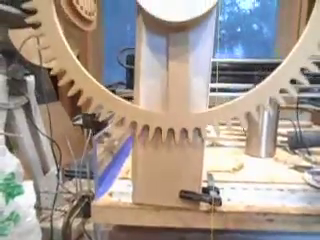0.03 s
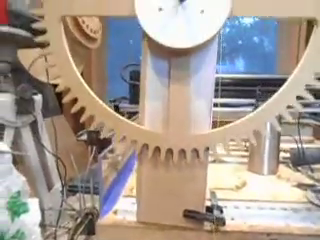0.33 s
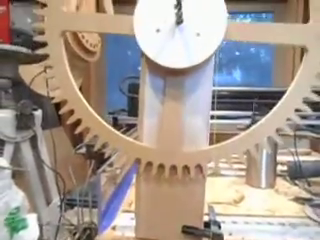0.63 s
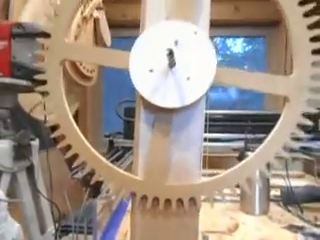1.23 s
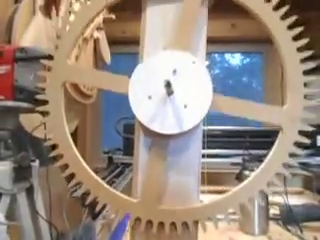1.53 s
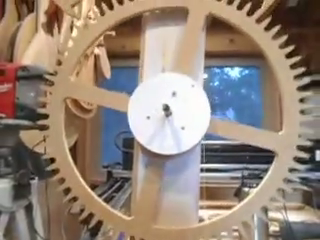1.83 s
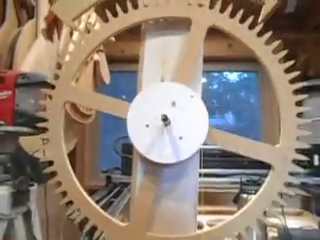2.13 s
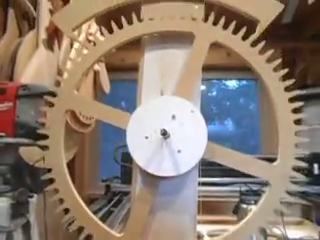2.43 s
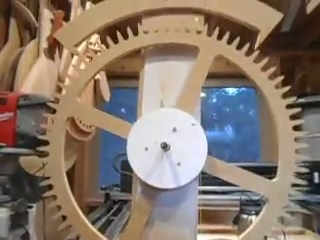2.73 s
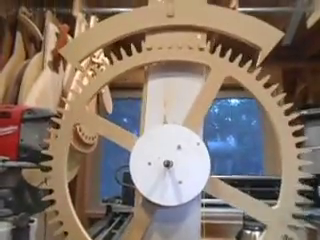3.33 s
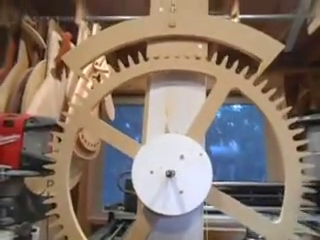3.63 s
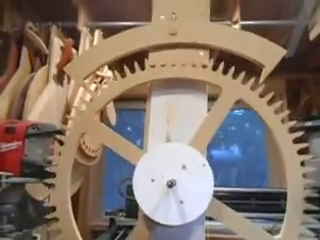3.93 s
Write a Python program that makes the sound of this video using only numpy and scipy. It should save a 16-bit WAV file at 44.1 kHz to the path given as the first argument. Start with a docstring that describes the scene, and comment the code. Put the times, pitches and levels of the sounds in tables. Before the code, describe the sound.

A wooden clock mechanism ticks and tocks in uneven pairs, a lighter knock followed quickly by a heavier one. Its teeth softly scuff between beats and a loose part clacks once, heard up close in a quiet workshop.

```python
"""A large wooden escapement beats a limping tick-tock, close to one microphone in a small, quiet workshop.
A tooth rubs off one pallet, now and then snagging or squeaking, and the next lands on the other: a sharp
contact click, then a knock that spreads through wheel and frame, treble first and bass later. On the tock
the tooth also seats with a crack and recoils. A loose part clacks; the room rumbles and hisses behind."""
import sys
import numpy as np
from scipy import signal
from scipy.io import wavfile
from scipy.ndimage import uniform_filter1d

SR = 44100
rng = np.random.default_rng(int(sys.argv[2]) if len(sys.argv) > 2 else 0)


def bounce(signal):
    """Save signal as a 16-bit WAV file at the path given by the first command-line argument."""
    frames = np.transpose(np.atleast_2d(signal))
    limited = np.clip(frames, -1, 1)
    pcm = np.round(limited * 32767).astype(np.int16)
    wavfile.write(sys.argv[1], SR, pcm)


N = 176400
AGE = np.arange(SR // 2) / SR   # time since a blow [s]
BAND_HZ = 25 * 2 ** (np.arange(28) / 3)
BAND_FILTERS = [signal.butter(2, [hz * 2 ** (-1 / 6), hz * 2 ** (1 / 6)], "band", fs=SR, output="sos")
                for hz in BAND_HZ]


def from_db(db):
    """Decibels as an amplitude factor."""
    return 10 ** (np.asarray(db) / 20)


def at_bands(points, below=None):
    """A table read at the third-octave centres, as a column."""
    hz, value = np.transpose(points)
    return np.interp(np.log(BAND_HZ), np.log(hz), value, left=below)[:, None]


def add(out, s, sound):
    """Mix a sound in at time s."""
    i = int(s * SR)
    part = sound[max(-i, 0):max(N - i, 0)]
    out[max(i, 0):max(i, 0) + len(part)] += part


def band_noise(size):
    """Third-octave bands of noise, rms 1 each."""
    white = rng.standard_normal((2, size + SR // 10))
    bands = np.array([signal.sosfilt(sos, white[k % 2])[-size:] for k, sos in enumerate(BAND_FILTERS)])
    return bands / bands.std(axis=1, keepdims=True)


def coloured_noise(colour, resonances):
    """Steady broad noise, plus noise passed twice through each narrow resonance."""
    out = (from_db(at_bands(colour)) * band_noise(N)).sum(0)
    for hz, width, db in resonances:
        b, a = signal.iirpeak(hz, hz / width, fs=SR)
        band = signal.lfilter(b, a, signal.lfilter(b, a, rng.standard_normal(N)))
        out += from_db(db) * band / band.std()
    return out


# Room tone of the workshop: (frequency [Hz], third-octave level [dB])
ROOM_COLOUR = [(25, -52), (40, -47.5), (58, -48.5), (80, -52.5), (120, -56), (170, -45.5), (230, -52.5),
               (300, -47.5), (450, -55.5), (950, -47.5), (1500, -48), (2100, -48.5), (3200, -53.5),
               (4500, -61), (7700, -52.5), (10000, -55)]
# Narrow bands of hiss in the background: (frequency [Hz], width [Hz], level [dB])
ROOM_WHIRR = [(1025, 98, -55.5), (2256, 85, -50)]
# Slow drift of the room tone: (time [s], gain [dB])
ROOM_DRIFT = [(0, 2), (.45, 3), (.8, 0), (1.4, -0.5), (2, -1.5), (2.65, -2.5), (3.25, 0), (3.8, -3),
              (4, -1.5)]
def room_tone():
    """Soft rumble and hiss all round the microphone."""
    drift_db = np.interp(np.arange(N) / SR, *np.transpose(ROOM_DRIFT))
    return from_db(drift_db) * coloured_noise(ROOM_COLOUR, ROOM_WHIRR)


# Reverberation of the workshop: (frequency [Hz], t60 [s])
ROOM_DECAY = [(100, 0.39), (500, 0.49), (2000, 0.31), (8000, 0.38)]
def envelopes(colour, t60, travel_s, rise_s, room_db):
    """Each band arrives, builds up and dies into the room; the bass travels slower (times at 1 kHz)."""
    slowness = np.sqrt(1000 / BAND_HZ)[:, None]
    t = np.maximum(AGE - travel_s * slowness, 0)
    swell = 1 - np.exp(-t / (rise_s * slowness))
    room_tail = from_db(room_db - 60 * t / at_bands(ROOM_DECAY))
    decay = np.hypot(from_db(-60 * t / t60), room_tail)
    return from_db(at_bands(colour, below=-120)) * swell * decay


def knock(shape, grain=None, alike=0.74):
    """A blow on dense wood resonances; a pallet's grain, if given, is the share that always sounds alike."""
    noise = band_noise(len(AGE))
    if grain is not None:
        noise = np.sqrt(alike) * grain + np.sqrt(1 - alike) * noise
    bands = shape * noise
    gains = np.sqrt((shape ** 2).sum(1) / (bands ** 2).sum(1))   # every band keeps its energy
    return gains @ bands


# Ring of the tooth tip: (frequency [Hz], t60 [s], level [dB])
TOOTH_MODES = [(5350, 0.017, -39), (5730, 0.0098, -25.5), (6300, 0.02, -26.5), (7230, 0.0093, -24),
               (7000, 0.0088, -31.5), (9900, 0.0036, -28)]
def click(second_touch_s=0.001181, second_db=-4):
    """The tooth tip touches twice in quick succession and rings briefly."""
    out = 0
    for delay, touch_db in ((0, 0), (second_touch_s * rng.uniform(0.594, 1.36), second_db)):
        t = np.maximum(AGE - delay, 0)
        for hz, t60, db in TOOTH_MODES:
            decay = from_db(db + touch_db + rng.normal(0, 3.4) - 60 * t / t60)
            out += decay * np.sin(2 * np.pi * hz * rng.normal(1, 0.027) * t)
    return out


# A loose wooden part clacks: (time [s], gain [dB])
CLACK_HITS = [(1.626, 0.5), (1.639, -4.5)]
# Its thin, bright wood: (frequency [Hz], third-octave level [dB])
CLACK_COLOUR = [(200, -73), (450, -24), (750, -20.5), (1300, -32.5), (2700, -25), (4000, -29),
                (6500, -33.5), (10000, -31.5)]
# The tooth tip bounces on the pallet once more: (time [s], gain [dB])
TOOTH_BOUNCES = [(3.608, -8.5)]
def clacks():
    """A loose part and a bouncing tooth clack between the beats."""
    out = np.zeros(N)
    shape = envelopes(CLACK_COLOUR, t60=0.058, travel_s=0.00024, rise_s=0.00086, room_db=-15)
    for s, db in CLACK_HITS:
        add(out, s, from_db(db) * knock(shape))
    for s, db in TOOTH_BOUNCES:
        add(out, s, from_db(db) * (click() + from_db(-3) * knock(shape)))
    return out


# A tooth sticks and squeaks: (time [s], length [s], frequency [Hz], level [dB])
TOOTH_SQUEAKS = [(1.113, .014, 4850, -41), (2.933, .01, 4990, -39), (2.956, .011, 4950, -32),
                 (2.953, .016, 7750, -37), (3.28, .035, 7800, -43), (3.517, .013, 4900, -44)]
def squeaks():
    """Brief, thin stick-slip tones just before a tooth drops."""
    out = np.zeros(N)
    for s, length, hz, db in TOOTH_SQUEAKS:
        arch = np.sin(np.pi * np.minimum(AGE / length, 1))
        add(out, s, from_db(db) * arch * np.sin(2 * np.pi * hz * AGE))
    return out


# The sliding tooth snags: (time [s], gain [dB])
TOOTH_SNAGS = [(.452, -4), (.497, -4), (1.115, 9.5), (1.73, 7), (2.333, 7.5)]
# Scuff of a snag: (frequency [Hz], third-octave level [dB])
SNAG_COLOUR = [(400, -50), (850, -31.5), (1400, -51), (2200, -36.5), (3300, -60), (5000, -58), (8000, -48),
               (10000, -56)]
def snags():
    """Short, soft scuffs as a tooth catches on the pallet, close and almost dry."""
    out = np.zeros(N)
    shape = envelopes(SNAG_COLOUR, t60=0.038, travel_s=0.0004, rise_s=0.003, room_db=-28)
    for s, db in TOOTH_SNAGS:
        add(out, s, from_db(db) * knock(shape))
    return out


# Friction of tooth on pallet: (frequency [Hz], third-octave level [dB])
RUB_COLOUR = [(500, -47.5), (1400, -61), (3300, -44.5), (6000, -45), (8500, -64), (10000, -54)]
# Resonances that the rubbing excites: (frequency [Hz], width [Hz], level [dB])
RUB_RESONANCES = [(850, 250, -38), (2020, 200, -39.5), (4800, 300, -49), (7690, 400, -41.5)]
def rubbing(tick_db=-7, tock_db=0, rough_db=3, swell_s=0.0064, slide_s=0.078, slide_db=-7):
    """A tooth slides quietly and unevenly along the pallet, then swells just before it drops off."""
    t, level = np.arange(N) / SR, np.zeros(N)
    for beats, db in ((TICK_BEATS, tick_db), (TOCK_BEATS, tock_db)):
        for s, *_ in beats:
            ahead = np.maximum(s - t, 0)
            slide = from_db(slide_db) * np.exp(-ahead / slide_s)
            level += (t < s) * from_db(db) * (slide + np.exp(-ahead / swell_s))
    uneven = uniform_filter1d(rng.standard_normal(N), size=300)
    return level * from_db(rough_db * uneven / uneven.std()) * coloured_noise(RUB_COLOUR, RUB_RESONANCES)


# Bending wave as it reaches the microphone: (time after the blow [s], level [dB])
BEND_ENVELOPE = [(0, -39), (.006, -23.5), (.014, -31.5), (.025, -15.5), (.04, -24), (.055, -21),
                 (.075, -24), (.1, -36)]
def bending_wave(floor_hz=103.76, excess_hz=179.56, fall_power=1.15):
    """Short waves run through the wood faster than long ones, so a blow arrives as a falling sweep."""
    fall = (np.maximum(AGE, 0.0035) / 0.025) ** -fall_power   # 1 at 25 ms
    hz = floor_hz + excess_hz * rng.normal(1, 0.043) * fall
    level_db = np.interp(AGE, *np.transpose(BEND_ENVELOPE), right=-np.inf)
    return from_db(level_db) * np.sin(2 * np.pi * np.cumsum(hz) / SR)


# Modes of wheel and frame: (frequency [Hz], t60 [s], tick level [dB], tock level [dB])
FRAME_MODES = [(55.6, 0.41, -29.5, -20), (103.6, 0.34, -49, -26), (140.5, 0.38, -36.5, -19.5),
               (167, 0.31, -30, -14), (185.25, 0.42, -19.5, -20.5), (227.9, 0.27, -18.5, -16),
               (254.6, 0.11, -25, -15.5), (300, 0.35, -17.5, -15), (369.5, 0.29, -21.5, -30),
               (540.4, 0.29, -27.5, -25), (640.4, 0.36, -30, -26), (712.5, 0.24, -24.5, -22.5),
               (909.5, 0.12, -25, -19.5), (1007, 0.14, -23, -29), (2016, 0.06, -24.5, -15.5)]
def frame_ring(beat, travel_s, rise_s=0.013, scatter_db=1):
    """The modes swell as the blow spreads through the frame, then ring out (times at 300 Hz)."""
    out = 0
    for k, (hz, t60, tick_db, tock_db) in enumerate(FRAME_MODES):
        slowness = np.sqrt(300 / hz)
        t = np.maximum(AGE - travel_s * slowness, 0)
        swell = 1 - np.exp(-t / (rise_s * slowness))
        db = rng.normal(tick_db if beat == "tick" else tock_db, scatter_db)
        detune = rng.normal(1, 0.007)   # the modes shift as the wheel turns
        out += (-1) ** k * swell * from_db(db - 60 * t / t60) * np.sin(2 * np.pi * hz * detune * t)
    return out


# Ring time of the wood, on tick and tock alike: (frequency [Hz], t60 [s])
WOOD_DECAY = [(100, 0.52), (300, 0.2), (700, 0.18), (1100, 0.092), (2000, 0.086), (4000, 0.043),
              (10000, 0.01)]
# Wood struck at the first pallet: (frequency [Hz], third-octave level [dB])
TICK_COLOUR = [(90, -38), (160, -34), (300, -22.5), (430, -25), (600, -22), (1000, -22), (1450, -38.5),
               (1950, -28), (3200, -39), (6200, -30.5), (10000, -36)]
# A tooth lands on the first pallet: (time [s], body gain [dB], click gain [dB])
TICK_BEATS = [(.268, 1, 2), (0.898, 0.5, -4), (1.518, 0.5, 3), (2.128, 0.5, -0.5), (2.721, -1, -1.5),
              (3.314, 1, 0), (3.899, 0.5, -6.5)]
def ticks():
    """The lighter beat, close by: a click and a knock that sweeps downwards."""
    out, grain = np.zeros(N), band_noise(len(AGE))
    wood = envelopes(TICK_COLOUR, at_bands(WOOD_DECAY), travel_s=0.0003, rise_s=0.0035, room_db=-9.5)
    for s, body_db, click_db in TICK_BEATS:
        body = knock(wood, grain) + bending_wave() + frame_ring("tick", travel_s=0.00706)
        add(out, s, from_db(body_db) * body + from_db(click_db) * click())
    return out


# Knock, seating crack and recoil at the second pallet: (frequency [Hz], third-octave level [dB])
TOCK_COLOUR = [(90, -34.5), (140, -24.5), (260, -29.5), (450, -30.5), (700, -22.5), (1000, -23),
               (1400, -27.5), (2100, -31), (4000, -34), (7000, -33), (10000, -38.5)]
SEAT_COLOUR = [(400, -22), (900, -34), (1500, -21.5), (2150, -14), (3100, -29), (5000, -29), (7500, -36),
               (10000, -59)]
RECOIL_COLOUR = [(140, -31.5), (270, -30), (450, -30), (1000, -37), (2300, -39), (4000, -49), (6200, -37),
                 (7700, -40), (10000, -40)]
# A tooth lands on the second pallet: (time [s], knock [dB], frame [dB], bending wave [dB], click [dB],
# seat delay [s], seat [dB], recoil delay [s], recoil [dB])
TOCK_BEATS = [(-.05, 5.5, -1, -24, 2, 0.007, 5.5, 0.062, -9), (0.521, 1.5, 3, -1, 6, 0.0066, 2, 0.046, 1.5),
              (1.1525, 1.5, -0.5, -2.5, -3, 0.0059, 0, 0.046, 0.5),
              (1.767, 1, -0.5, 1.5, -3.5, .007, 3.5, .049, -1.5),
              (2.371, 0, -1.5, -4.5, -0.5, .007, 4.5, .049, -3),
              (2.968, 2, 0.5, -9, 2.5, 0.007, 2, 0.043, 0.5),
              (3.55, 2, -0.5, 1, 0.5, 0.006, -2.5, 0.048, -4)]
def tocks():
    """The heavier beat, close by: click, deep knock, the crack of the tooth seating, a scuff on recoil."""
    out, grain, seat_grain = np.zeros(N), band_noise(len(AGE)), band_noise(len(AGE))
    wood = envelopes(TOCK_COLOUR, at_bands(WOOD_DECAY), travel_s=0.00021, rise_s=0.0026, room_db=-11.5)
    seat = envelopes(SEAT_COLOUR, t60=0.016, travel_s=0.0003, rise_s=0.0007, room_db=-25)
    recoil = envelopes(RECOIL_COLOUR, t60=0.21, travel_s=0.0004, rise_s=0.0039, room_db=-8)
    for s, knock_db, frame_db, bend_db, click_db, seat_s, seat_db, recoil_s, recoil_db in TOCK_BEATS:
        add(out, s, from_db(knock_db) * knock(wood, grain))
        add(out, s, from_db(click_db) * click())
        add(out, s, from_db(frame_db) * frame_ring("tock", travel_s=0.00394))
        add(out, s, from_db(bend_db) * bending_wave())
        add(out, s + seat_s, from_db(seat_db) * knock(seat, seat_grain))
        add(out, s + recoil_s, from_db(recoil_db) * knock(recoil))
    return out


def scene():
    """The escapement in front, the workshop behind, on one mono microphone."""
    return (ticks() + tocks() + rubbing() + snags() + squeaks() + clacks() + room_tone())[None]


def record(dry):
    """The highest treble steps down, then is cut."""
    edge_hz, shelf_db, cutoff_hz = 10450, -16, 12050
    below = signal.sosfilt(signal.cheby1(12, 0.3, edge_hz, fs=SR, output="sos"), dry)
    above = signal.sosfilt(signal.butter(10, edge_hz, "high", fs=SR, output="sos"), dry)
    shelved = below + from_db(shelf_db) * above
    return signal.sosfilt(signal.cheby1(12, 0.3, cutoff_hz, fs=SR, output="sos"), shelved)


dry = scene()
out = record(dry)
bounce(out)
```